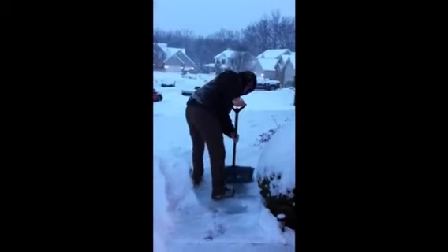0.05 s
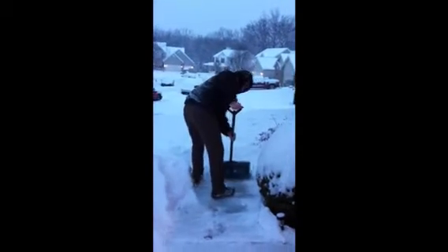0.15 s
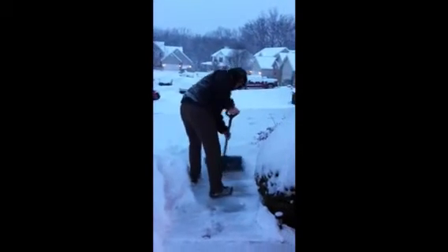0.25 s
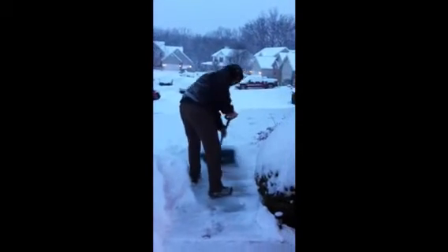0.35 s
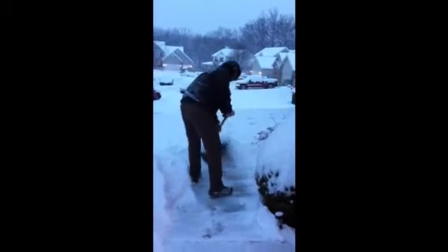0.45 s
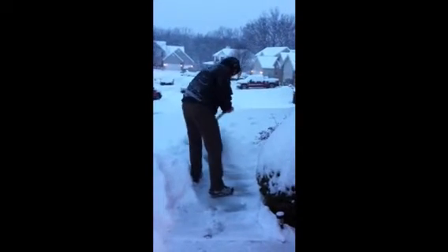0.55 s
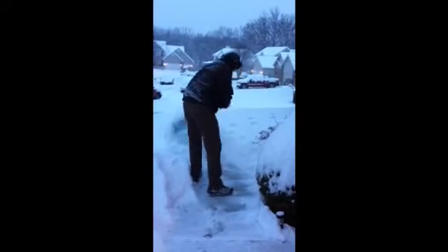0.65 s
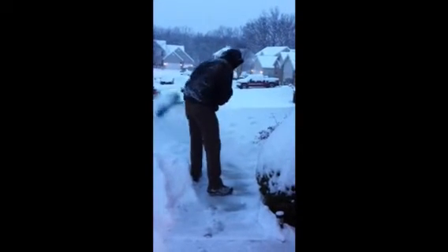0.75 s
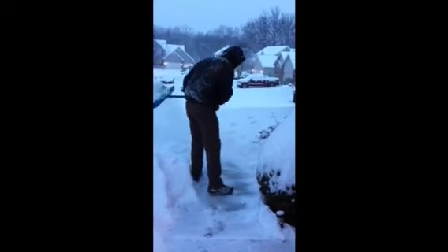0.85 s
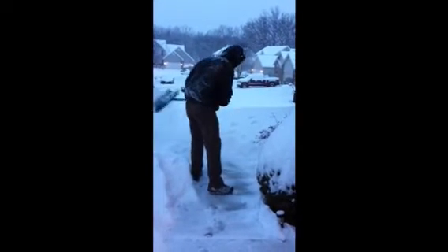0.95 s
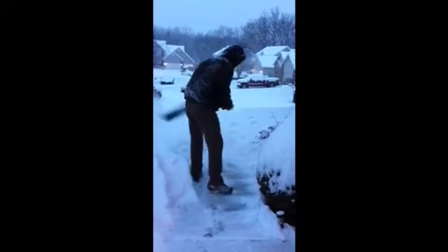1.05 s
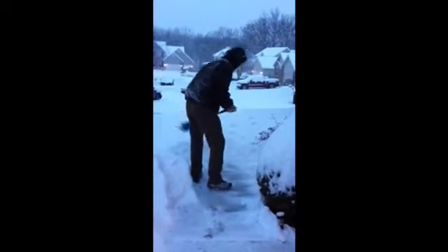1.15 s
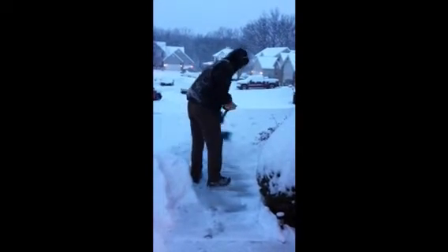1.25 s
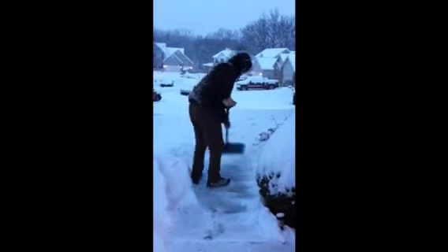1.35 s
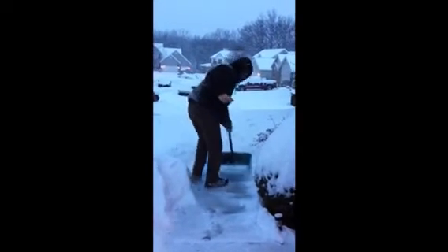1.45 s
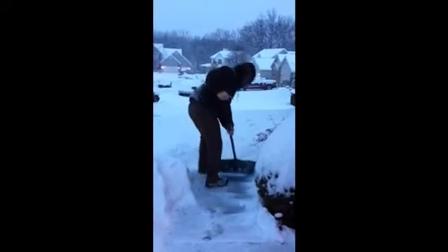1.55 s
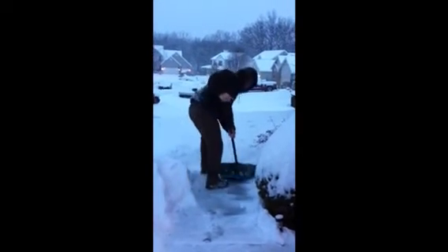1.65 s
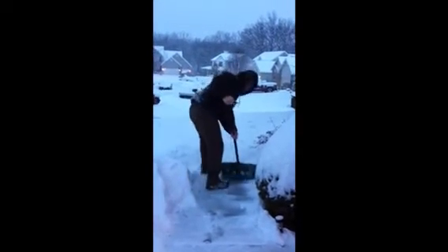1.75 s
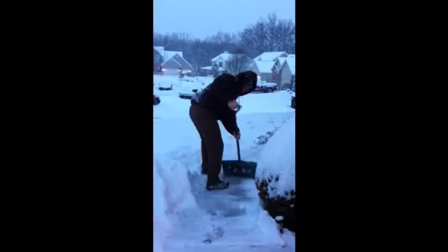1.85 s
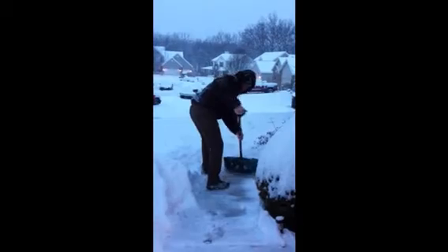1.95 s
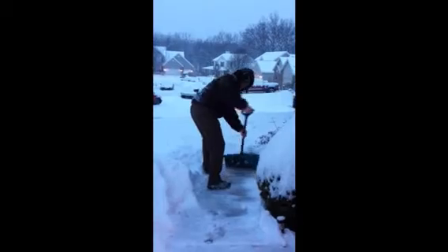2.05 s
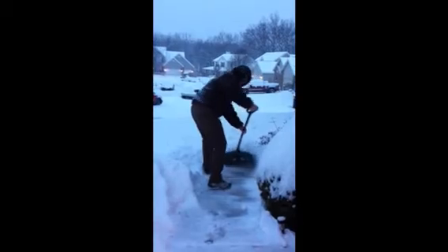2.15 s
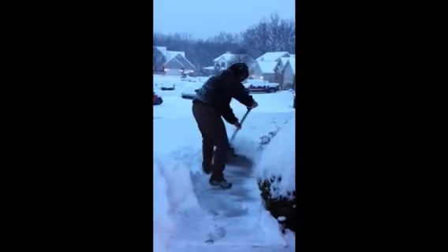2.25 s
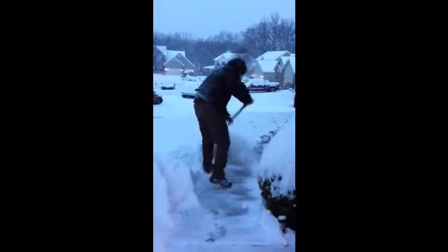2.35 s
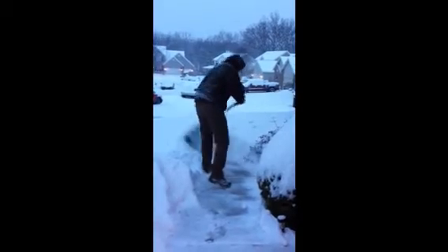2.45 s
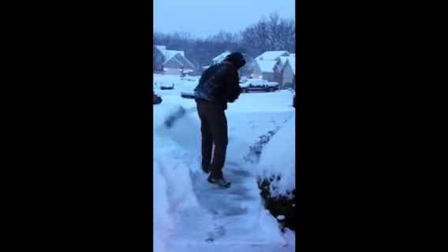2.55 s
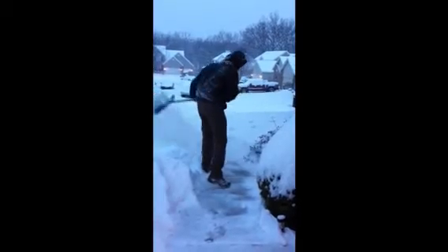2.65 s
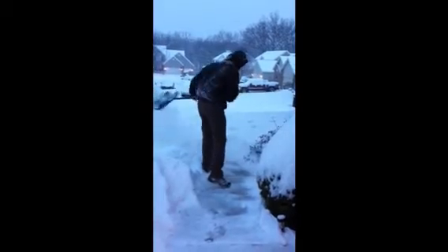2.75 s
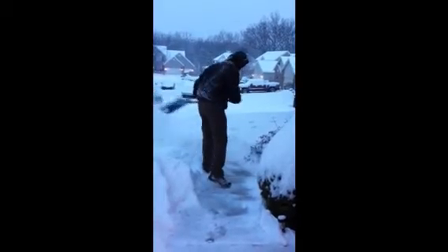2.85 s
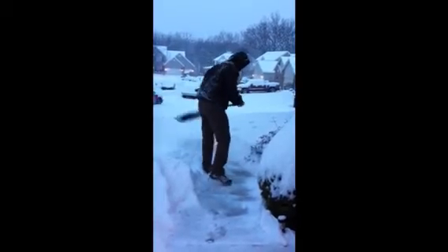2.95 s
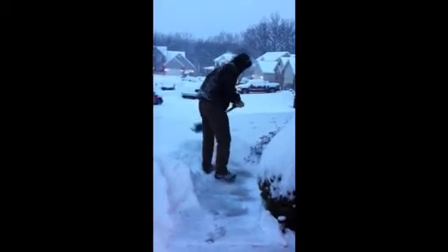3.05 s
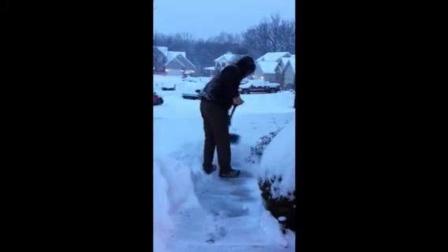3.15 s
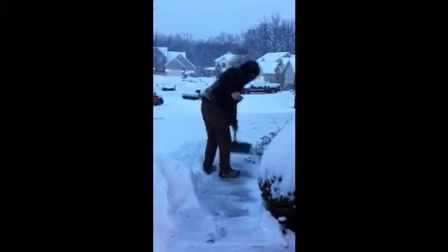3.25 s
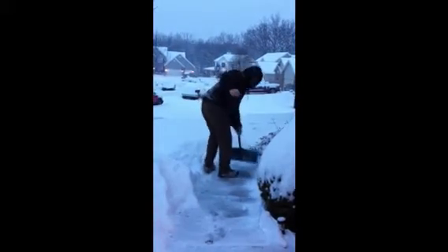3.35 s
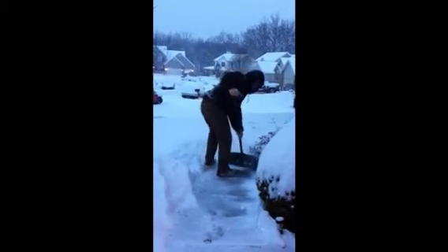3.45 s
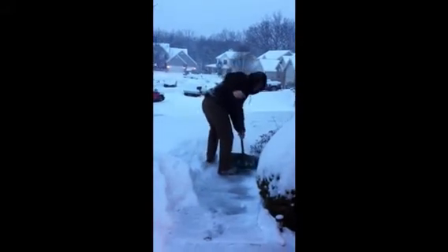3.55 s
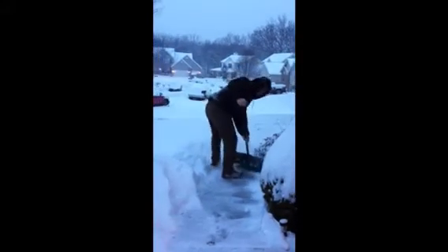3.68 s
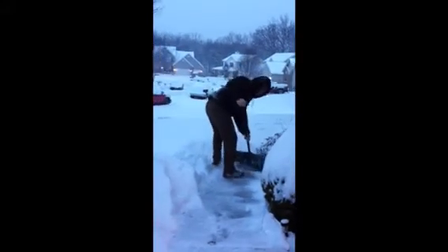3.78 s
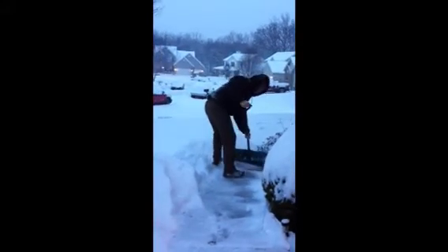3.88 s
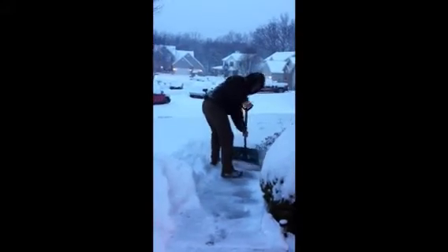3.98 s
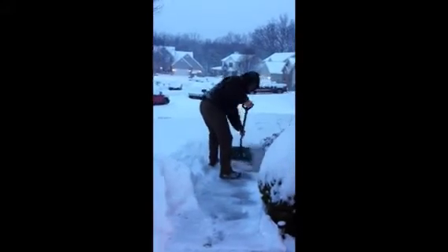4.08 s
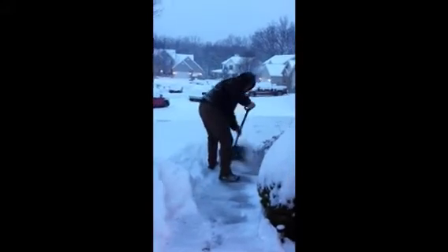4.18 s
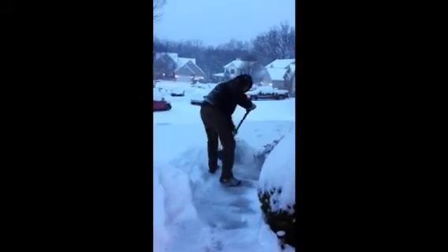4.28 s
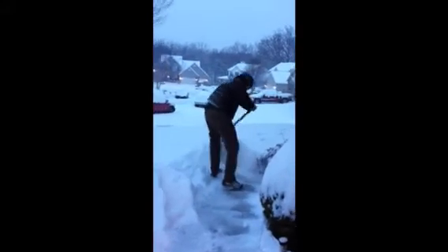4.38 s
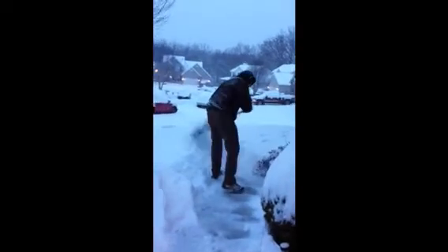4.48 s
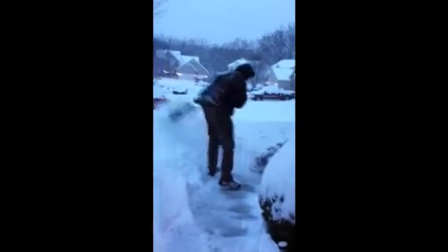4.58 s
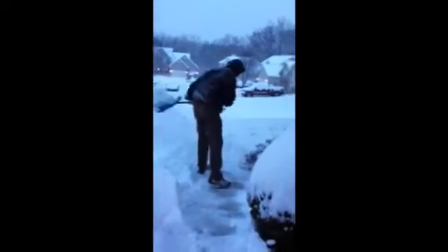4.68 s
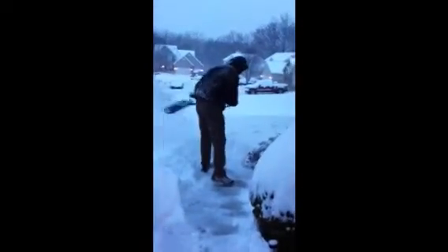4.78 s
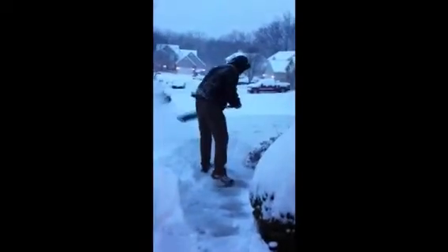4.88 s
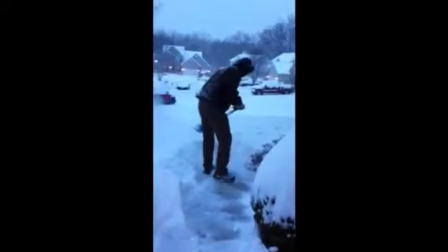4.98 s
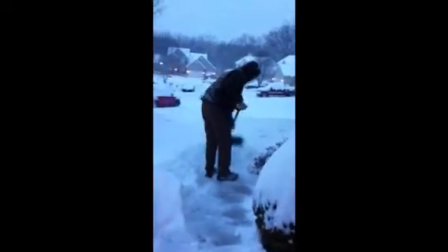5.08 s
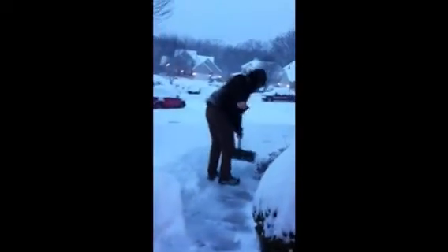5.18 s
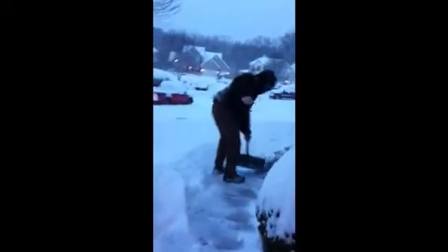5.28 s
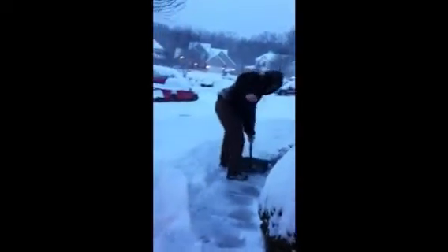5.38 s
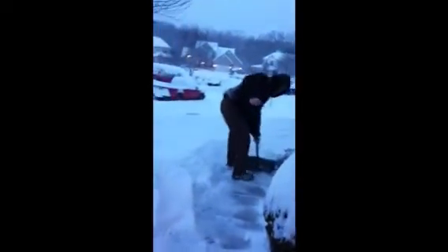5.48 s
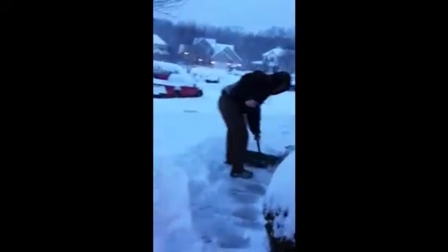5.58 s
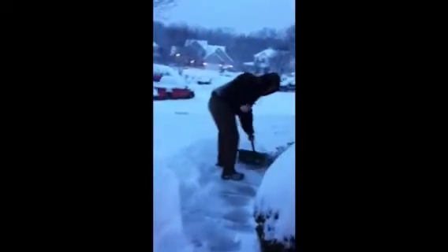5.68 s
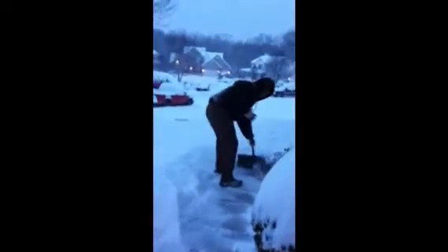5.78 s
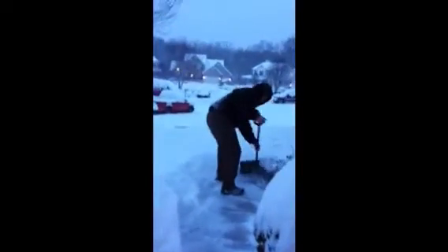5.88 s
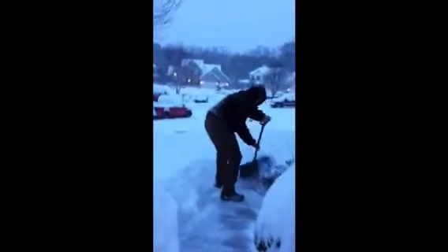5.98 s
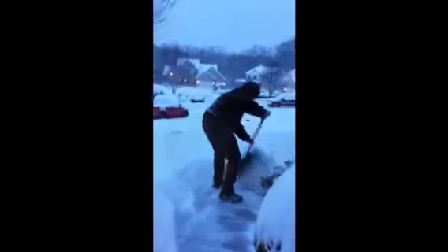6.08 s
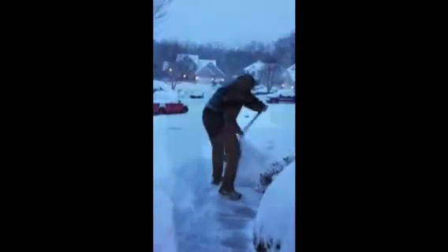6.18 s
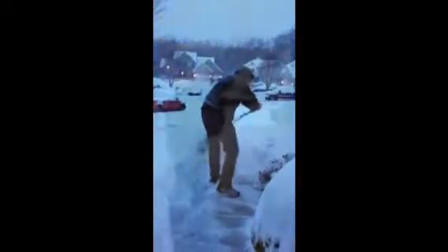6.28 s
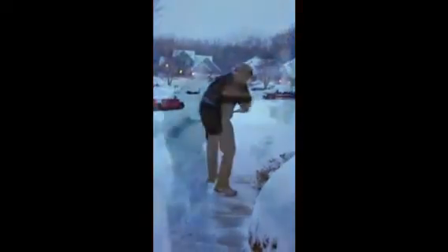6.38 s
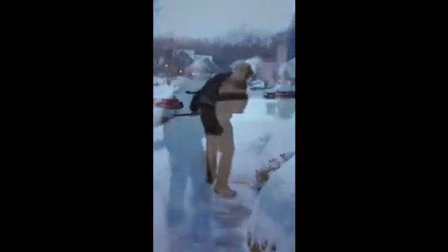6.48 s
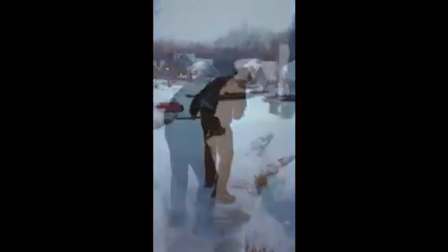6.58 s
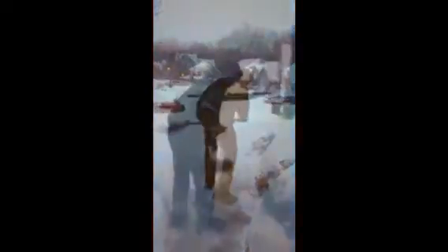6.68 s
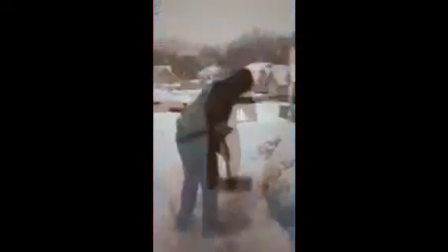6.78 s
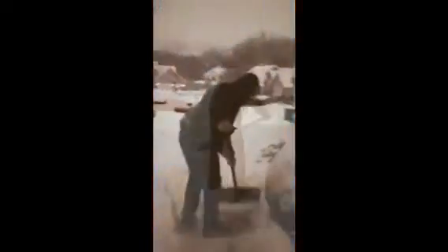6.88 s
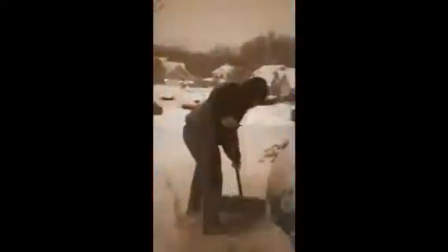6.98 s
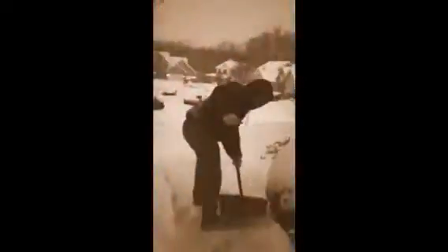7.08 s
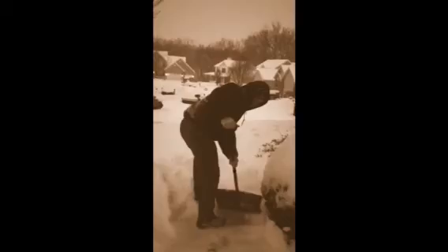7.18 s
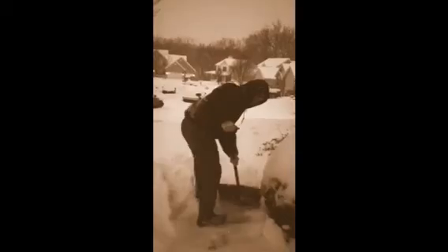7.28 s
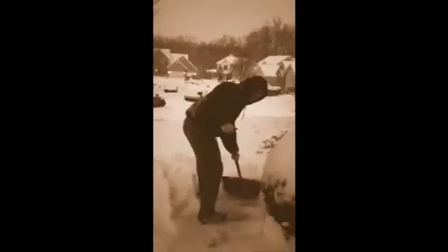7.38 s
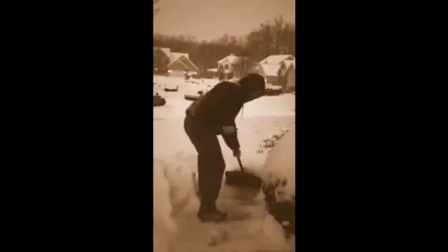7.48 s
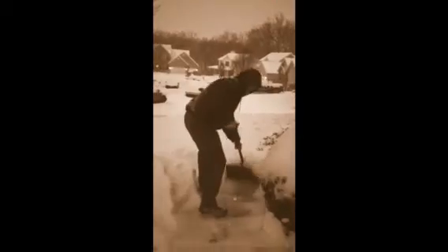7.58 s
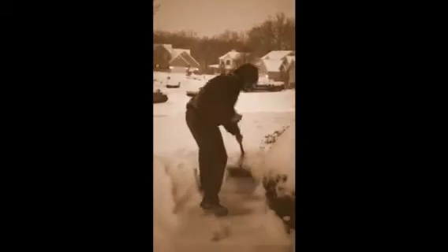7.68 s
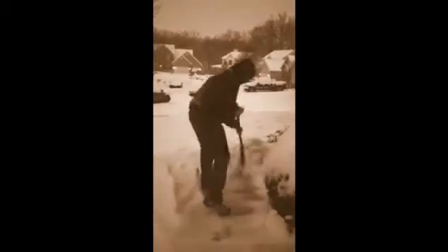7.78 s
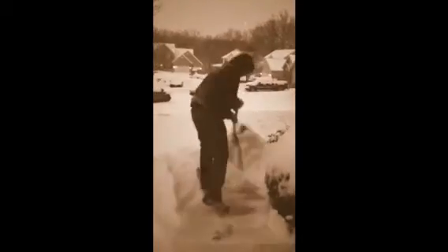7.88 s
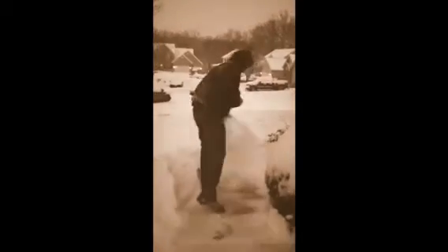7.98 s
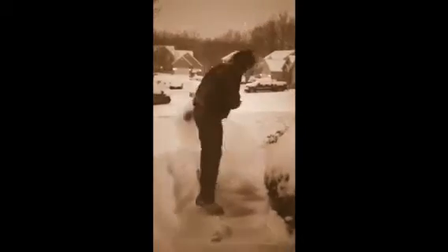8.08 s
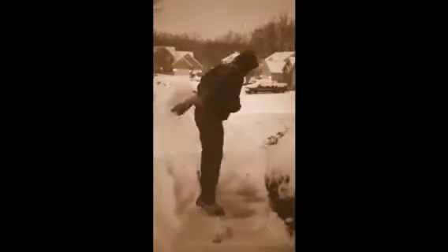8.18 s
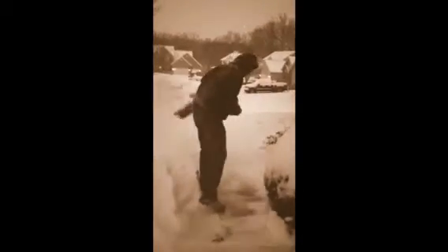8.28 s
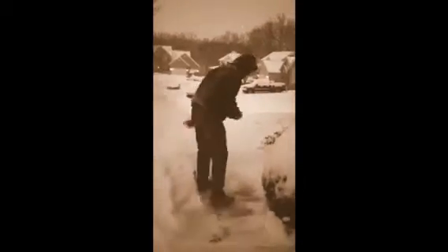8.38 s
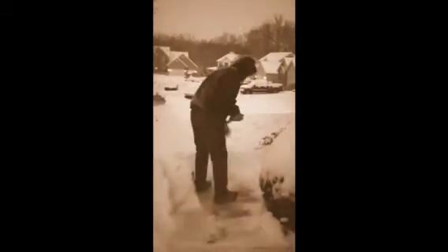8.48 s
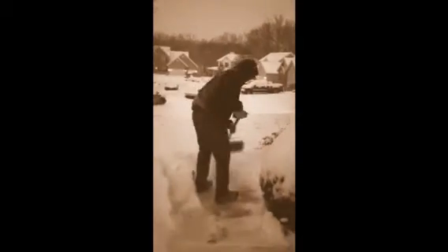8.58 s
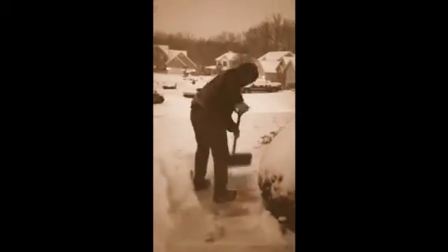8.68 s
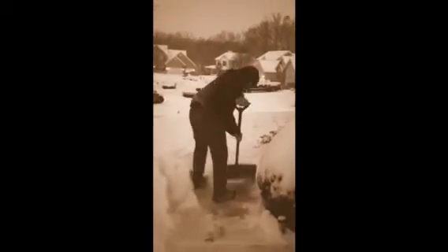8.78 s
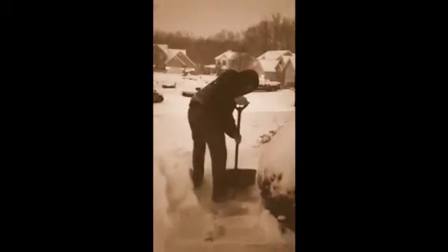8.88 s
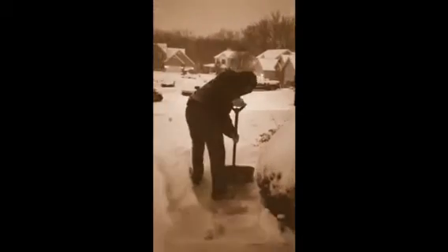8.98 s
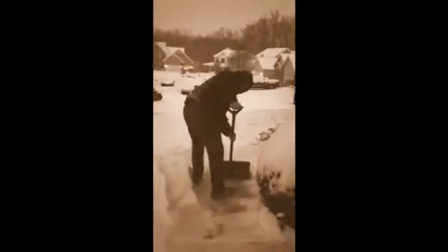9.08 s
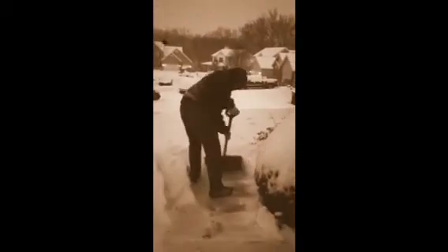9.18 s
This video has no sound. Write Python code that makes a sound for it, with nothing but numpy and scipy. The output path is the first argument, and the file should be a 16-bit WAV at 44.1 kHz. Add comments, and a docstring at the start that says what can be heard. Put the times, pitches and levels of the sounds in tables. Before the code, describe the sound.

Someone shovels snow outdoors: gritty, rasping half-second scrapes with sharp snaps and hollow clacks, separated by near-quiet pauses with soft boot crunches.

```python
"""Six times, someone sets a plastic snow shovel down on a concrete walk, pushes it scraping forward and lifts it.
Knocks and sharp snaps fall before and within the strokes, while random tiny slips of the edge ring blade and scoop.
Between strokes the shovel clacks, boots scuff with bursts of crackling noise and a jacket whistles softly.
All along, shaped noise makes the hum and tyre rush of far traffic and a fine hiss behind the snowy street."""
import sys
import numpy as np
from scipy import signal
from scipy.fft import rfft, irfft, next_fast_len
from scipy.io import wavfile
from scipy.ndimage import uniform_filter1d, map_coordinates

SR = 44100
rng = np.random.default_rng(int(sys.argv[2]) if len(sys.argv) > 2 else 0)


def digitize_waveform(pressure):
    """Quantize a signal to 16-bit integers and store it at the path in sys.argv[1].

    Rows of a 2-D input are taken as channels; values are limited to [-1, 1].
    """
    field = np.atleast_2d(pressure).T
    bounded = np.clip(field, -1, 1)
    quanta = np.round(bounded * 32767).astype(np.int16)
    wavfile.write(sys.argv[1], SR, quanta)


N = 407484

# Colour of the edge scratching over grit, also lent to snaps and snow crystals.
# Each row: frequency in Hz, relative level in dB per Hz.
GRIT_COLOUR = [(1200, -36), (2500, -3.5), (3200, 0.5), (4200, 5), (6000, 4.5), (8000, 1.5), (11500, 4),
               (13800, 2.5), (15500, -10)]
# Colour of hard plastic meeting concrete. Each row: frequency in Hz, relative level in dB per Hz.
CRACK_COLOUR = [(200, -15), (600, 8), (1050, 3.5), (1500, 7), (2400, -5.5), (4000, -10), (15000, -16)]


def scrape():
    """The edge sticks and slips over concrete; the slips ring edge, blade and scoop."""
    # Colour of the duller rasp. Each row: frequency in Hz, relative level in dB per Hz.
    rasp_colour = [(25, -18), (120, -13), (200, -6.5), (500, -0.5), (1050, -3), (1400, -3), (2500, -7),
                   (3500, -10), (9000, -28)]
    # Resonances of the scoop. Each row: frequency in Hz, width in Hz, level in dB.
    scoop_modes = [(214, 44, 0), (248, 52, -.5)]
    # A load of snow lowers the boom, an empty scoop rings higher. Each row: time in seconds, pitch ratio.
    scoop_pitch = [(2.0, 1.03), (3.7, 1.09), (5.8, 1.17), (7.2, 1)]
    grit_gain, treble_gain, rasp_gain, boom_gain = shoves()

    catching = 1 + 0.38 * bursts(rate=130, life_s=0.0016, spread_db=2.5)
    catching = catching * amp(0.5 * wobble(250))
    slips = grains(rate=16000, spread_db=3.0) * catching

    # the blade bends as it is pushed, so its resonances stray
    bend = 1 + 0.008 * wobble(14)
    grit = flexed(plastic(coloured(slips, GRIT_COLOUR)), bend)
    # the point of contact wanders along the edge, so the resonances keep trading strength
    grit = shifting(grit, depth_db=2.8)
    treble = filtered(grit, lambda f: f ** 4 / (f ** 4 + 8000 ** 4))

    rasp = plastic(coloured(grains(rate=3500, spread_db=3.5) * catching, rasp_colour))
    rasp = shifting(rasp, depth_db=2.9)

    # friction limits the swing of the scoop, which evens out its boom
    swing = np.tanh(8.4 * resonant(slips, scoop_modes))
    boom = resonant(swing, [(235, 133, 0)])
    boom = flexed(boom, curves(scoop_pitch)[0])

    edge = grit_gain * (grit - treble) + treble_gain * treble
    return edge + rasp_gain * rasp + boom_gain * boom + plastic(stones(rasp_gain))


def shoves():
    """Gains of grit, its treble, rasp and boom: each shove builds up, leans in or eases off, and dies away."""
    # Shoves of the blade: in each stroke it bites, drives on and drags off.
    # Each row: start in seconds, attack in seconds, hold in seconds, time to fall 60 dB in seconds,
    # rasp in dB, swell during the hold in dB, grit over rasp in dB, boom over rasp in dB,
    # extra treble of the grit in dB.
    shove_rows = [(0.147, 0.0054, 0.018, .08, -40, -8, 1, 3, -1),
                  (0.164, 0.0064, 0.054, 0.15, -34.5, 5.5, -3, -10.5, 4.5),
                  (0.232, 0.0019, 0.045, 0.089, -28, -3, 0, -5, -2),
                  (0.291, 0.0029, 0.0094, 0.14, -27, -2.5, -1.5, 0, 5.5),
                  (0.361, 0.016, 0.08, 0.33, -51, -5.5, 2, 0, -2),
                  (1.77, 0.0033, 0.014, 0.054, -43.5, -2, -3.5, 1.5, 11),
                  (1.814, 0.008, 0.017, 0.36, -32, 1, -7.5, -2.5, 9),
                  (1.887, 0.025, 0.095, 0.37, -32.5, 3, 1.5, -8, 1),
                  (2.174, 0.0054, 0.02, 0.12, -42, -2.5, -5.5, -22, 0),
                  (3.673, 0.0026, 0.032, 0.2, -31.5, -1, -7, -10, 10.5),
                  (3.727, 0.0083, 0.057, 0.13, -37, 1.5, 0, -8, 7),
                  (3.856, .004, 0.044, 0.13, -48, 5.5, 2, -19, 6.5),
                  (3.889, 0.0061, 0.12, 0.099, -41, 0.5, 2, -3.5, 1.5),
                  (4.013, 0.016, 0.076, 0.18, -38, -7, 2.5, -7, -6.5),
                  (4.108, .008, 0.056, 0.36, -42, -0.5, 0, -14.5, 1.5),
                  (5.598, 0.0041, 0.033, 0.19, -37, -1.5, 5.5, -6.5, -2),
                  (5.65, 0.021, 0.042, 0.099, -40.5, -0.5, -3.5, -8, 3),
                  (5.723, .003, 0.015, 0.06, -44, 1, -2, -6.5, 2),
                  (5.741, .012, 0.055, 0.48, -52.5, -3.5, 1.5, -5, 4.5),
                  (7.219, 0.0058, 0.027, 0.51, -34, 2.5, -3.5, -8.5, 3),
                  (7.316, 0.019, 0.073, 0.081, -28, -6.5, 0.5, -5.5, -10),
                  (7.403, 0.003, 0.024, 0.047, -34.5, 0, -3.5, -14, -10),
                  (7.434, 0.0079, 0.16, 0.46, -47.5, -6, -1.5, -20, -2),
                  (9.022, 0.0045, 0.014, .1, -39.5, -10, -2.5, 1.5, 1),
                  (9.04, 0.0043, 0.075, .12, -32.5, -0.5, -1.5, -8.5, 2),
                  (9.109, 0.0042, 0.041, 0.093, -27.5, -7.5, 2.5, -3, -3),
                  (9.158, 0.013, 0.012, 0.16, -30.5, -3, 0, 2.5, 3)]
    grit_swell_db = 0.5  # change of the grit against the rasp over one shove
    # the scoop swings up later than the edge and takes longer to settle
    boom_lag_s, boom_release_ratio = 0.0077, 1.13

    grit, treble, rasp, boom = np.zeros((4, N))
    t = np.arange(SR) / SR
    for s, attack, hold, release, db, swell_db, grit_db, boom_db, treble_db in shove_rows:
        progress = np.clip((t - attack) / hold, 0, 1)
        force = amp(db + swell_db * progress) * np.minimum(t / attack, 1)
        fade_db = -60 * np.maximum(t - attack - hold, 0) / release
        edge = force * amp(grit_db + grit_swell_db * progress + fade_db)
        # overlapping shoves add up as power
        add(rasp, s, (force * amp(fade_db)) ** 2)
        add(grit, s, edge ** 2)
        add(treble, s, (edge * amp(treble_db)) ** 2)  # bare concrete is brighter than packed snow
        boom_gain = force * amp(boom_db + fade_db / boom_release_ratio)
        add(boom, s + boom_lag_s, boom_gain ** 2)
    return np.sqrt([grit, treble, rasp, boom])


def stones(force):
    """Stones are dragged under the edge in short scratches, louder as it presses harder."""
    # Colour of the scratches. Each row: frequency in Hz, relative level in dB per Hz.
    stone_colour = [(150, -20), (600, 0), (1500, 4), (2700, -5), (5000, 1), (9000, -16), (15000, -20)]
    scratches = bursts(rate=110, life_s=0.0017, spread_db=1.0) * rng.standard_normal(N)
    level_db = -10  # against the rasp
    return amp(level_db) * force * coloured(scratches, stone_colour)


def judders(sharpness=8):
    """For a moment friction feeds one mode of the blade: a rough, short note inside the scrape."""
    # Each row: start in seconds, length in seconds, frequency in Hz, level in dB.
    judder_rows = [(0.233, .06, 560, -35), (1.991, 0.054, 1304, -31.5), (2.027, 0.11, 6000, -42),
                   (3.668, 0.046, 440, -33.5), (4.023, 0.13, 1820, -42.5), (7.219, 0.064, 517, -32.5)]
    track = np.zeros(N)
    for s, length, hz, db in judder_rows:
        swell = signal.windows.tukey(int(length * SR), .5)
        mode = [(hz, hz / sharpness, 0)]
        note = resonant(resonant(rng.standard_normal(SR // 2), mode), mode)
        note = note[-len(swell):]  # the mode has built up by then
        add(track, s, amp(db) * swell * unit(note))
    return track


def snaps():
    """The edge catches and lets go with a crack of a few milliseconds, and the blade answers."""
    # The edge snaps over a stone or ridge of ice, or the lifted blade ticks.
    # Each row: time in seconds, bright tick of the edge in dB, dull clack of the blade in dB.
    snap_rows = [(0.17, -12.5, -28), (0.244, -12, -22), (.2945, -24, -25), (0.415, -29.5, -30),
                 (1.1733, -59, -34.5), (1.855, -12.5, -24), (1.927, -21, -31), (1.997, -11.5, -15),
                 (2.0145, -21, -32), (2.044, -27, -25), (2.173, -26, -39), (3.693, -15.5, -28),
                 (3.793, -16, -28), (3.955, -25, -27), (4.084, -35, -24.5), (5.099, -44, -36),
                 (5.427, -40, -54), (5.7305, -33, -30), (6.176, -62, -44), (7.234, -12, -15.5),
                 (7.3383, -23, -14.5), (7.353, -25, -23), (7.421, -34, -15), (7.608, -36, -30),
                 (7.7575, -34, -36), (7.7915, -48, -33), (9.046, -13.5, -24), (9.1195, -11.5, -23),
                 (9.1707, -20, -25)]
    track, t = np.zeros(N), np.arange(SR // 30) / SR
    # a quick fade over a fainter, slower one; both times are for a fall of 60 dB
    quick = amp(-60 * t / 0.0068)
    slow = amp(-24 - 60 * t / .05)
    fade = (quick + slow) * (1 - np.exp(-t / .0002))
    for s, edge_db, blade_db in snap_rows:
        edge, blade = rng.standard_normal((2, len(t)))
        tick = amp(edge_db) * coloured(edge, GRIT_COLOUR)
        clack = amp(blade_db) * coloured(blade, CRACK_COLOUR)
        add(track, s, fade * (tick + clack))
    return plastic(track)


def knocks():
    """Soft blows wake low modes, hard ones high modes and a dry crack; boot steps are low thumps."""
    # Modes of the knocked shovel. Each row: frequency in Hz, level in dB, time to fall 60 dB in seconds.
    shovel_modes = [(166, 1.5, 0.068), (268, 1.5, 0.11), (368.5, -8, 0.13), (535, 6, 0.028),
                    (672, -3, 0.063), (902, -2.5, 0.033), (1240, 1.5, 0.026), (1500, -21, 0.076),
                    (1800, 0, 0.014), (2000, -6, 0.02), (2620, 5, 0.02)]
    # The shovel is set down, jolted or shaken, or a boot steps down with a low thump.
    # Each row: time in seconds, level in dB, centre of the blow's spectrum in Hz,
    # dry crack over the ring in dB.
    knock_rows = [(.073, -25, 163, -24), (.121, -25, 420, -9.5), (.236, -15.5, 1290, -3),
                  (.417, -29, 1000, 1), (0.56, -40, 697, -24), (1.161, -33, 730, -22),
                  (1.174, -33.5, 1000, -17), (1.739, -20, 310, -4.5), (1.815, -18, 674, -5.5),
                  (2.173, -28, 1130, -15), (3.043, -41, 790, -22), (3.673, -24, 477, -26),
                  (5.083, -39.5, 200, -15), (7.128, -22.5, 340, -28), (7.167, -42, 1600, -1.5),
                  (7.603, -27.5, 1420, -16), (7.615, -39, 140, -5), (8.949, -25.5, 173, -25),
                  (8.9953, -22.5, 425, -12), (9.110, -15.5, 1350, -2.5), (9.146, -16, 880, -24)]
    blow_octaves = 0.85  # width of a blow's spectrum
    clack_db, clack_cycles = 3, 0.53  # the contact itself: level over the ring, life in cycles
    crack_t60_s = 0.042
    low_hz = 131  # the knocks thin out below this

    track, t = np.zeros(N), np.arange(SR // 4) / SR
    hz, level, t60 = np.transpose(shovel_modes)[:, :, None]
    for s, db, centre_hz, crack_db in knock_rows:
        blow = lambda f: amp(-5.5 * (np.log2((f + 1) / centre_hz) / blow_octaves) ** 2)
        cycles = t * centre_hz

        # every blow rings the modes a little differently
        strength, detune, phase = rng.standard_normal((3, len(hz), 1))
        gain = amp(level + 1.8 * strength) * blow(hz)
        tones = np.sin(2 * np.pi * (hz * (1 + 0.024 * detune) * t + phase))
        ring = np.sum(gain * amp(-60 * t / t60) * tones, axis=0) / np.linalg.norm(gain)

        puff = unit(filtered(rng.standard_normal(len(t)), blow)) * amp(-11.0 - 60 * t / 0.036)
        body = (ring + puff) * (1 - np.exp(-cycles / 1.03))

        clack = amp(clack_db) * np.sin(2 * np.pi * cycles) * np.exp(-cycles / clack_cycles)
        clack *= 1 - np.exp(-cycles / .15)

        crack = coloured(rng.standard_normal(len(t)), CRACK_COLOUR)
        crack *= amp(crack_db - 60 * t / crack_t60_s) * (1 - np.exp(-t / .0007))
        add(track, s, amp(db) * (clack + plastic(crack) + body))
    return filtered(track, lambda f: (1j * f / (1j * f + low_hz)) ** 2)


def plastic(x):
    """Whatever touches the shovel is heard through the resonances of blade and edge; the power is kept."""
    # Resonances of the dragged blade. Each row: frequency in Hz, width in Hz, lift in dB.
    blade_modes = [(407, 42, 2.5), (575, 170, 3), (863, 55, 6.5), (1214, 26, 5), (1382, 130, 3.5),
                   (1926, 230, 5.5), (2110, 73, 6.5), (2606, 154, 9.5), (2829, 27, 6.5)]
    # Ringing of the stiff edge strip. Each row: frequency in Hz, width in Hz, lift in dB.
    edge_modes = [(3706, 73, 3), (4410, 120, 4), (5500, 83, 2), (6180, 570, 3), (7250, 260, 0.5)]
    hz, width, db = np.transpose(list(blade_modes) + list(edge_modes))[:, :, None]
    f, lift = np.fft.rfftfreq(4096, 1 / SR), np.sqrt(amp(db))
    off, loss = hz * hz - f * f, 1j * f * width
    peaks = (off + loss * lift) / (off + loss / lift)
    impulse = irfft(peaks.prod(axis=0))
    return np.std(x) * unit(signal.oaconvolve(x, impulse)[:len(x)])


def houses(x, t60, wet_db):
    """The house fronts send back a faint, dull echo, made of fading noise."""
    t = np.arange(SR // 2) / SR
    colour = [(150, 0.0), (600, 4.5), (2000, -1.5), (6000, -10.5), (14000, -28)]  # Hz, dB per Hz
    tail = coloured(rng.standard_normal(len(t)), colour)
    tail *= amp(-60 * t / t60) * (1 - np.exp(-t / 0.011))
    return amp(wet_db) * signal.oaconvolve(x, tail / np.linalg.norm(tail))[:N]


def scuffs():
    """Boots pack and slide loose snow: a dull crunch under a fizz of crystals."""
    # Each row: start in seconds, length in seconds, crunch in dB, fizz in dB.
    scuff_rows = [(0.976, 0.45, -62, -89), (1.366, 0.075, -57.5, -64), (2.291, 0.04, -53.5, -51),
                  (2.323, 0.07, -50.5, -49.5), (5.082, 0.12, -52, -58), (5.183, 0.13, -59.5, -60),
                  (5.361, 0.17, -62, -55.5), (5.423, 0.05, -60, -62), (6.348, 1, -61, -67),
                  (6.782, 0.14, -65.5, -59.5), (7.141, 0.13, -57, -59), (7.748, 0.066, -43.5, -56),
                  (7.893, 0.29, -63, -64), (8.554, 0.055, -55, -56), (8.977, 0.045, -56, -63)]
    # Colour of the crunch. Each row: frequency in Hz, relative level in dB per Hz.
    crunch_colour = [(200, -4.5), (700, 8.5), (1400, 11), (2100, 10), (2800, 8.5), (4500, -8),
                     (9000, -10.5)]
    skew, taper = 0.53, 1.26  # the weight comes on quickly and eases off
    crunch, fizz = np.zeros(N), np.zeros(N)
    for s, length, crunch_db, fizz_db in scuff_rows:
        u = np.linspace(0, 1, int(length * SR))
        swell = np.abs(np.sin(np.pi * u ** skew)) ** taper
        add(crunch, s, amp(crunch_db) * swell)
        add(fizz, s, amp(fizz_db) * swell)
    # snow gives way in small collapses
    clumps = 1.5 + 0.36 * bursts(rate=63, life_s=0.0081, spread_db=0)
    crystals = grains(rate=6000, spread_db=1.5) * clumps
    return crunch * coloured(crystals, crunch_colour) + fizz * coloured(crystals, GRIT_COLOUR)


def jacket():
    """Ribbed nylon rubs on itself: a fuzzy whistle that rises as the arm speeds up."""
    # Each row: middle of the swish in seconds, pitch at the middle in Hz, level in dB.
    swish_rows = [(1.035, 6600, -61), (2.525, 6950, -62), (8.12, 7450, -61)]
    track, t = np.zeros(N), np.linspace(-.06, .06, round(.12 * SR))
    for s, hz, db in swish_rows:
        fuzz = unit(filtered(rng.standard_normal(len(t)), lambda f: 1 / (1 + (f / 550) ** 2)))
        whistle = np.sin(2 * np.pi * hz * (t + 1.4 * t * t))
        add(track, s + t[0], amp(db) * np.hanning(len(t)) * fuzz * whistle)
    return track


def street():
    """Far traffic, a low hum and a rush of tyres, swells slowly over a fine, gently wavering hiss."""
    # Slow swells, before the gain of each layer. Each row: time in seconds, hum in dB, tyre rush in dB.
    traffic_rows = [(0.73, -66.5, -63.5), (1.56, -63.5, -63), (2.77, -65, -65.5), (4.7, -65.5, -63),
                    (6.07, -63.5, -61), (6.6, -59.5, -60), (7.97, -64.5, -62), (8.57, -64.5, -65)]
    # Colours of the three noises. Each row: frequency in Hz, relative level in dB per Hz.
    hum_colour = [(25, -15), (65, -28), (110, -12.5), (160, -1.5), (215, 0.5), (280, -2.5), (400, -7),
                  (900, -22.5)]
    tyre_colour = [(150, -21), (380, -6), (550, 3), (900, -1.5), (1150, -3), (1500, -3), (2500, -10.5),
                   (5000, -13.5), (10000, -22)]
    hiss_colour = [(1000, -24), (3000, -6), (7000, -6.5), (12000, 5), (15800, -1.5)]
    hum_gain_db, tyre_gain_db = 2, -1

    hum_db, tyre_db = curves(traffic_rows)
    hum = coloured(rng.standard_normal(N), hum_colour)
    hum *= amp(hum_gain_db + hum_db + 0.16 * wobble(14))
    tyres = shifting(coloured(rng.standard_normal(N), tyre_colour), depth_db=1.2)
    tyres *= amp(tyre_gain_db + tyre_db + .6 * wobble(7))
    waver_db = .9 * wobble(2.5) + .4 * wobble(12)
    hiss = shifting(coloured(rng.standard_normal(N), hiss_colour), depth_db=2.2)
    hiss *= amp(-65.5 + waver_db)
    return hum + tyres + hiss


def grains(rate, spread_db):
    """Tiny impacts at random moments, rate a second, of log-normal size, at rms 1."""
    size = amp(spread_db * np.clip(rng.standard_normal(N), -2.5, 2.5))
    return unit((rng.random(N) < rate / SR) * size * rng.choice([-1, 1], N))


def bursts(rate, life_s, spread_db):
    """An envelope of rms 1: sudden bursts at random moments, each dying within milliseconds."""
    keep = np.exp(-1 / (SR * life_s))  # share left after one sample
    return unit(signal.lfilter([1], [1, -keep], np.abs(grains(rate, spread_db))))


def shifting(x, depth_db, size=1024):
    """Narrow peaks and hollows that come and go in the spectrum of x, at rms 1."""
    z = signal.stft(x, nperseg=size)[2]
    field = uniform_filter1d(rng.standard_normal(z.shape), size=3, axis=0)  # smooth over frequency
    field = uniform_filter1d(field, size=7, axis=1)  # smooth over time
    return unit(signal.istft(z * amp(depth_db * unit(field)), nperseg=size)[1][:len(x)])


def flexed(x, ratio):
    """x with its pitch following a ratio from moment to moment, at rms 1."""
    return unit(map_coordinates(x, [np.cumsum(ratio)], mode="wrap"))


def resonance(f, modes):
    """Complex response of resonances, each with frequency in Hz, width in Hz and level in dB."""
    return sum(amp(db) * 1j * f * w / (c * c - f * f + 1j * f * w) for c, w, db in modes)


def resonant(x, modes):
    """x through the resonances, at rms 1."""
    return unit(filtered(x, lambda f: resonance(f, modes)))


def coloured(x, points, size=2048):
    """x through a causal filter shaped by (Hz, dB) points, at rms 1."""
    hz, db = np.transpose(points)
    f = np.fft.rfftfreq(size, 1 / SR)
    shape = amp(np.interp(np.log(f + 1), np.log(hz), db))
    # folding the cepstrum gives a filter that never sounds before its input
    cepstrum = irfft(np.log(shape))
    cepstrum[1:size // 2] *= 2
    cepstrum[size // 2 + 1:] = 0
    impulse = irfft(np.exp(rfft(cepstrum)))
    return unit(signal.oaconvolve(x, impulse)[:len(x)])


def filtered(x, response):
    """x times a complex response of frequency."""
    m = next_fast_len(len(x) + 8192)
    return irfft(rfft(x, m) * response(np.fft.rfftfreq(m, 1 / SR)), m)[:len(x)]


def wobble(rate):
    """A smooth random curve, rate knots a second."""
    knots = rng.standard_normal(int(N * rate / SR) + 4)
    return map_coordinates(knots, [np.arange(N) * rate / SR])


def curves(rows):
    """One value per sample for each column after the time."""
    s, *cols = np.transpose(rows)
    return [np.interp(np.arange(N) / SR, s, c) for c in cols]


def add(track, s, sound):
    """Mix a sound into the track at time s in seconds."""
    part = track[round(s * SR):][:len(sound)]
    part += sound[:len(part)]


def amp(db):
    """Decibels to gain."""
    return 10 ** (np.asarray(db) / 20)


def unit(x):
    """Scale to rms 1."""
    return x / np.sqrt(np.mean(x ** 2) + 1e-20)


def scene():
    """The shovel and boot steps with their echo, then scuffs and jacket, in front of the street."""
    contacts = scrape() + judders() + snaps() + knocks()
    echo = houses(contacts, t60=0.45, wet_db=-22.0)
    return (contacts + echo + scuffs() + jacket() + street())[None]


def record(dry):
    """Cut everything above a sharp band limit."""
    top_hz = 15950
    return filtered(dry[0], lambda hz: hz < top_hz)[None]


dry = scene()
out = record(dry)
digitize_waveform(out)
```